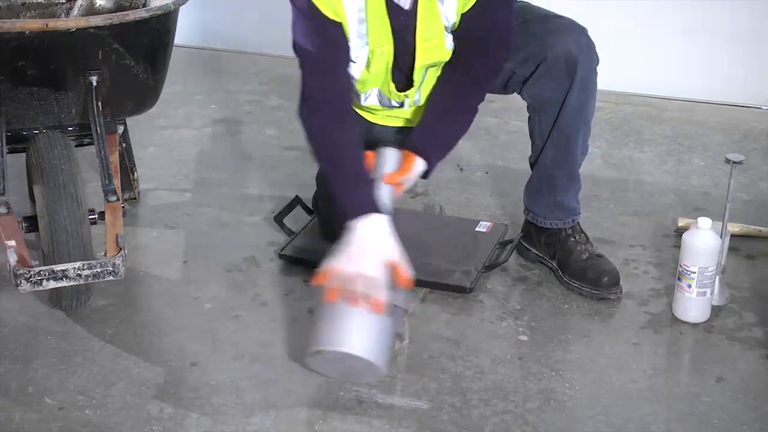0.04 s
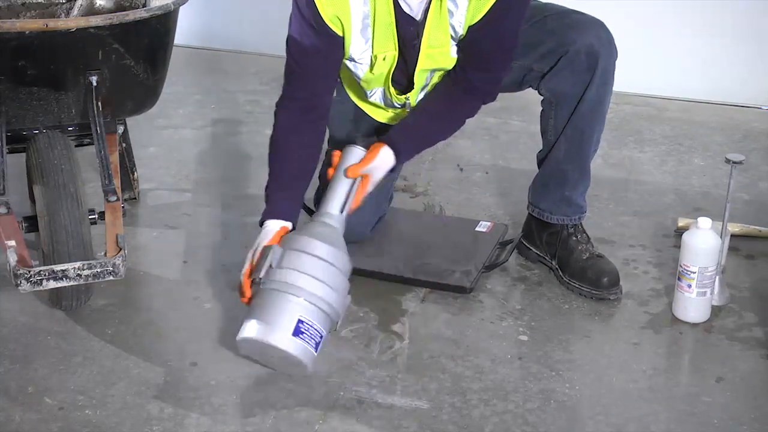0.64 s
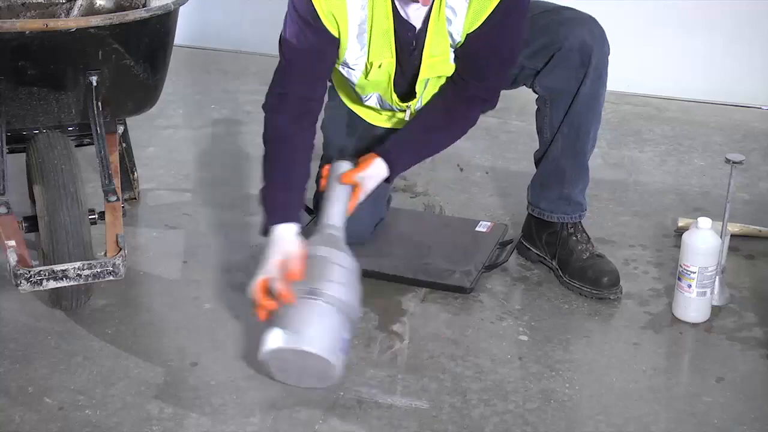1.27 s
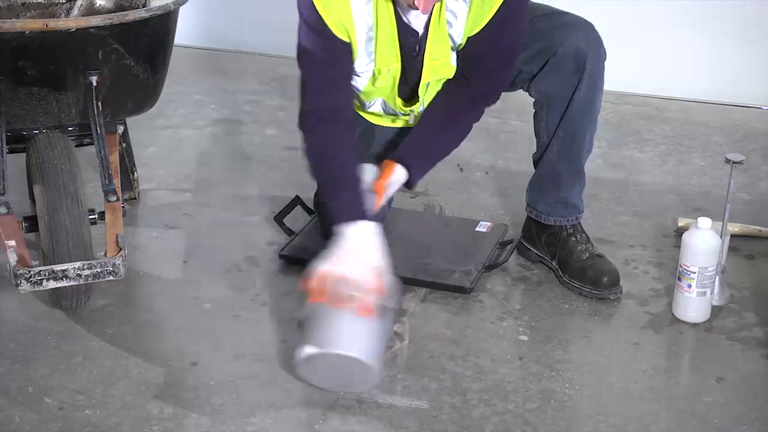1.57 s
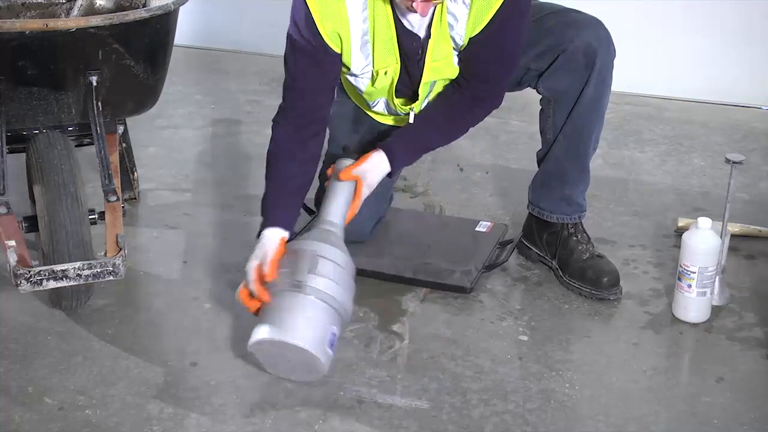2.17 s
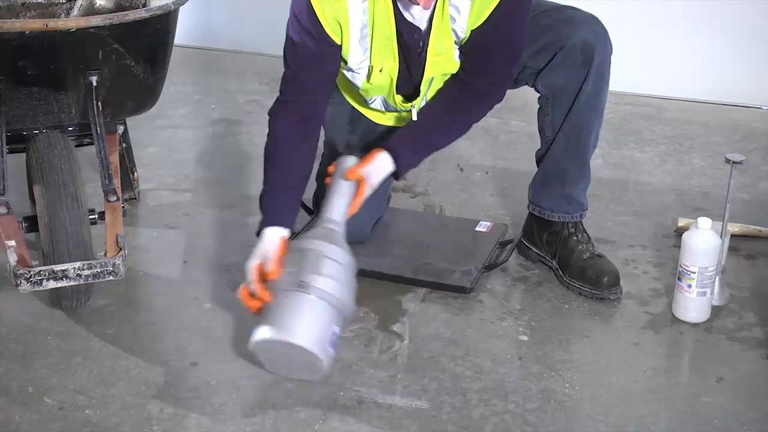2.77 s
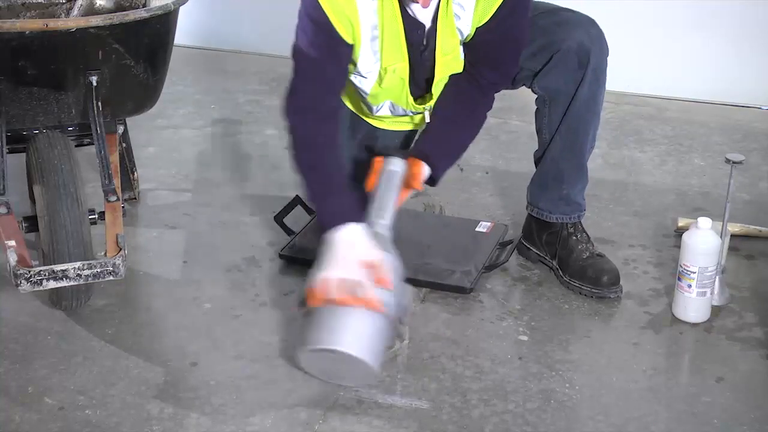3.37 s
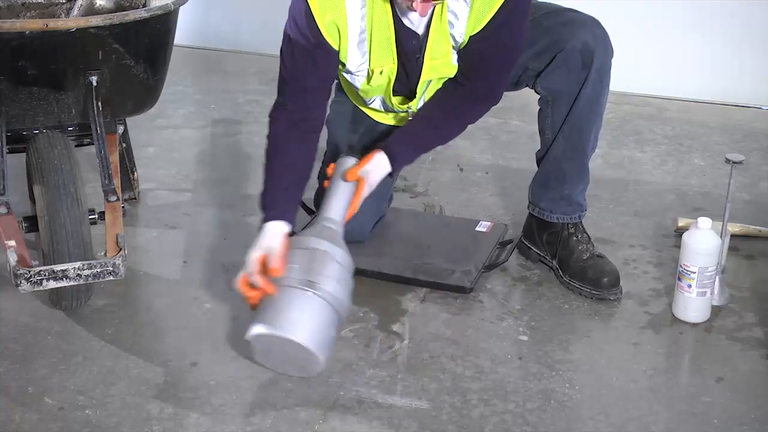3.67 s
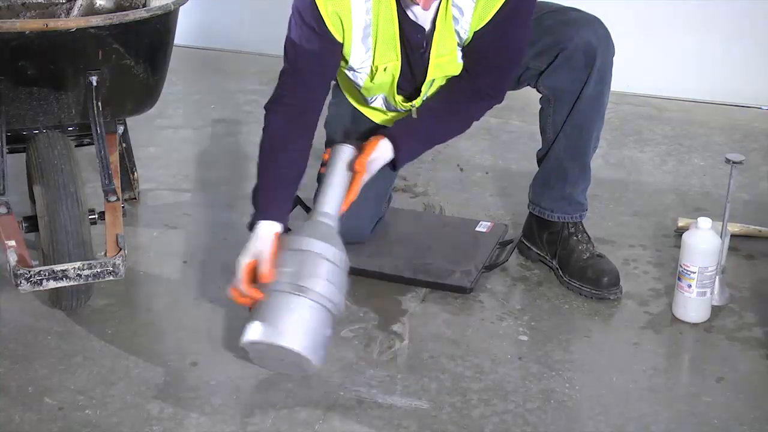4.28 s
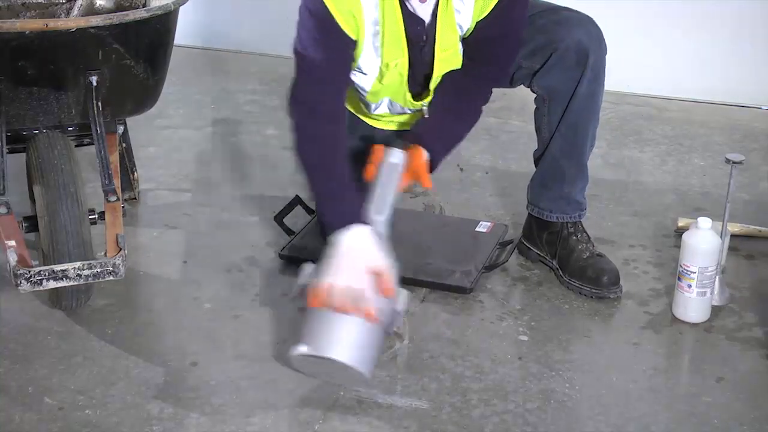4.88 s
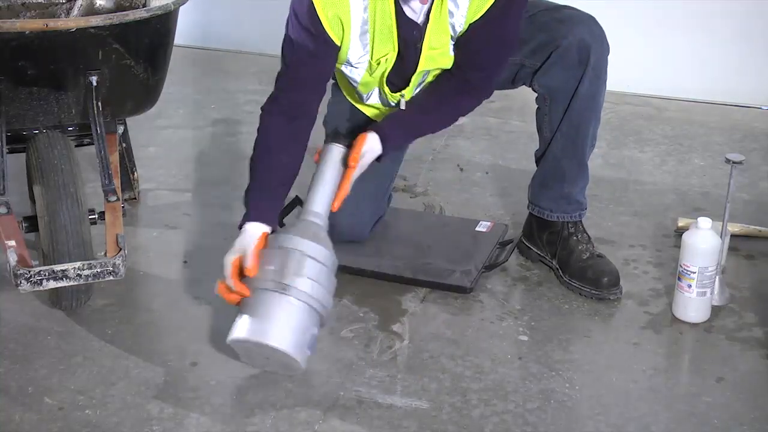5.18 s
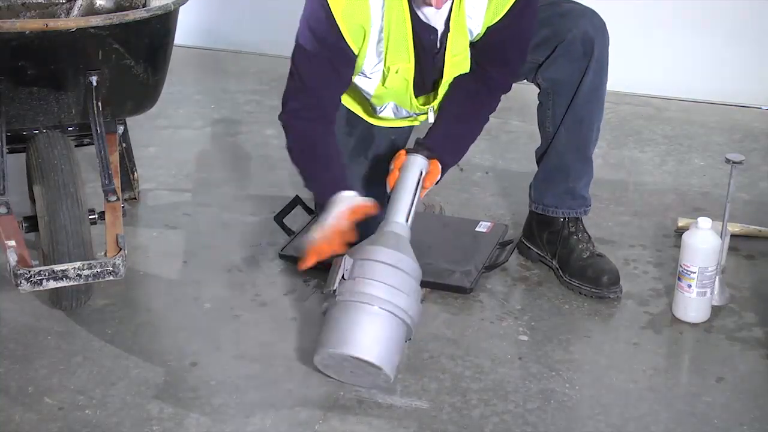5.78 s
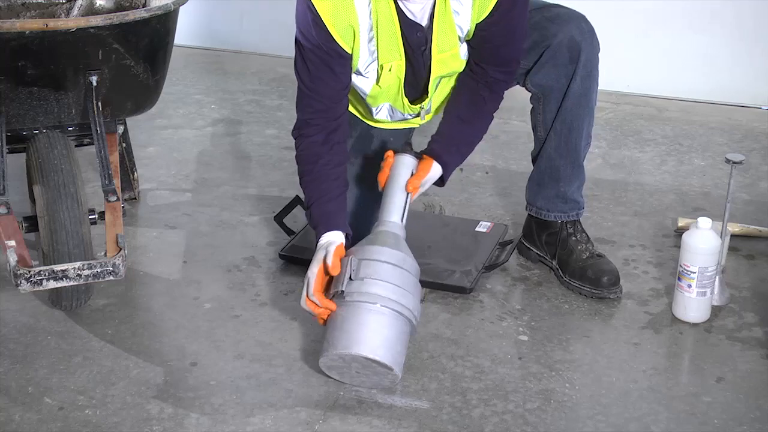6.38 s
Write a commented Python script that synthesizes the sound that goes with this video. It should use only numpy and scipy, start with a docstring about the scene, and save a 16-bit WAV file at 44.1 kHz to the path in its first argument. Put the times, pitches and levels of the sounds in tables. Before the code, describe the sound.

From the start, wet concrete sloshes inside a sealed metal container that is rolled quickly to and fro on its rim over a hard floor. The swings come steadily, about every 0.4 seconds, fifteen in all. Each gives a low, hollow surge with dull thuds, a gulp of trapped air and a few glugs. Stones knock and scrape along the wall, liquid patters faintly inside, and the bumping rim makes the shell ring briefly. The first swings are softer; the sound builds by about 2 seconds and is strongest around 3 to 4 seconds. Sleeves rustle and a stiff vest crackles lightly throughout. A steel clamp clinks quietly near 0.2, 4 and 5.4 seconds. The last swing comes at about 5.4 seconds and fades to a faint hush, with one tiny clink at 6.3 seconds. Everything sounds close, with a short workshop echo.

```python
"""Wet concrete sloshes in a sealed metal air meter, rolled to and fro on its rim, then held still.
On every swing the wet mix (the slurry) surges, thumps and glugs, and the trapped air gulps.
Stones tumble along the meter's wall, and the rim bumps over a workshop floor and rings the shell.
The lid's clamp clinks, sleeves rustle on a safety vest and liquid splashes inside.
The hard room adds a short echo."""
import sys
import numpy as np
from scipy import signal
from scipy.io import wavfile

SR = 44100
rng = np.random.default_rng(int(sys.argv[2]) if len(sys.argv) > 2 else 0)


def master_out(mix):
    """Clip the mix to full scale and print it as 16-bit PCM to the path in sys.argv[1]."""
    frames = np.transpose(np.atleast_2d(mix))
    ceiling = np.clip(frames, -1, 1)
    pcm = np.round(ceiling * 32767).astype(np.int16)
    wavfile.write(sys.argv[1], SR, pcm)


N = 283911

# Levels in all tables are relative: each sound gets its final loudness when it is mixed.
# The swings of the meter. Each row: middle in seconds, hold in seconds, levels in dB of slurry,
# stones, rim and splash, delay of the splash in seconds, level of the gulp in dB.
SWINGS = [(0.136, 0.1, -37.5, -39, -47.5, -59.5, 0.11, -41),
          (0.565, 0.13, -35, -36, -45.5, -63, 0.062, -41),
          (0.931, 0.099, -35, -35.5, -46, -60, 0.0088, -41),
          (1.337, 0.084, -33.0, -34, -46.5, -56.5, 0.085, -40.5),
          (1.692, 0.066, -31, -34, -42, -64, 0, -38), (2.092, 0.051, -31.5, -30.5, -40.0, -61, 0.028, -50),
          (2.402, 0.091, -30, -31.5, -45.5, -73, 0.072, -38),
          (2.822, 0.067, -30, -32, -41.0, -58, 0.0053, -36.5),
          (3.148, 0.078, -30.5, -29.5, -42.5, -70, 0.04, -35.5),
          (3.543, 0.025, -26.5, -27.5, -46, -60, 0.05, -49),
          (3.889, 0.12, -31.5, -32.5, -40.5, -63, 0.002, -32),
          (4.303, 0.057, -31.5, -33, -48.5, -77, 0.077, -42.5),
          (4.655, 0.1, -35, -38, -64, -69, 0.036, -36.5), (5.063, 0.071, -31, -35.5, -47, -87, 0.0076, -39),
          (5.421, 0.071, -30.5, -30.5, -46, -63, 0.029, -32)]
SLURRY, STONES, RIM, GULP = 2, 3, 4, 7  # column numbers
# Lumps landing on the wall. Each row: time in seconds, levels in dB of thud, slurry boom and shell ring.
THUMPS = [(0.06, -35, -46, -45), (0.517, -28.5, -28.5, -53.0), (0.552, -30, -49, -42.0),
          (0.602, -21.5, -40, -36), (0.834, -25, -33, -55), (0.895, -27, -43, -35.5),
          (0.925, -43, -28, -55), (1.275, -22.5, -48, -34.5), (1.338, -20.5, -29, -42),
          (1.62, -24.5, -23, -61), (1.684, -23, -20.5, -62), (1.785, -32.0, -32, -55.0),
          (2.054, -32, -25, -49), (2.081, -15, -26.5, -54), (2.344, -22, -32, -30),
          (2.425, -47, -44, -38.5), (2.782, -17.5, -30, -36.5), (2.814, -15.5, -34, -37.5),
          (3.073, -20.5, -26, -29), (3.115, -27, -19.5, -42), (3.198, -19.5, -43, -50.0),
          (3.229, -22, -41, -55), (3.513, -33, -29, -26.5), (3.534, -23.5, -36, -49),
          (3.591, -24.5, -33, -43), (3.801, -22.0, -22, -33), (3.935, -24.5, -27, -54),
          (4.273, -24, -31, -39), (4.31, -22, -41, -40), (4.603, -21.0, -24, -39.0),
          (4.619, -19.5, -28, -42.5), (4.663, -23.5, -35, -37), (5.022, -24, -31, -43),
          (5.063, -26.5, -36, -42), (5.36, -20.5, -37, -39.5), (5.448, -19.5, -33, -35.5)]
THUD, BOOM, RING = 1, 2, 3  # column numbers


def gain_of(db):
    """Turns decibels into a number to multiply a sound by."""
    return 10 ** (np.asarray(db) / 20)


def evened(x):
    """Scales x so that its average level (rms) is one."""
    return x / np.sqrt(np.mean(x ** 2) + 1e-20)


def steadied(x, seconds):
    """Keeps the fine grain of x but holds its slower level at one."""
    window = np.hanning(max(int(seconds * SR), 64))
    power = abs(signal.fftconvolve(x ** 2, window / window.sum(), "same"))
    return x / np.sqrt(power + 1e-20)


def read(points, hz):
    """Looks up a value between the rows of a table, on a logarithmic frequency scale."""
    f, value = np.transpose(points)
    return np.interp(np.log(hz + 1), np.log(f + 1), value)


def colour(x, spectrum, size=8192):
    """Gives x the tone colour in a table, with a filter that never sounds ahead of a hit."""
    log_gain = np.log(gain_of(read(spectrum, abs(np.fft.fftfreq(size, 1 / SR)))))
    taps = np.fft.ifft(np.exp(np.conj(signal.hilbert(log_gain)))).real[:size // 2]
    return signal.oaconvolve(x, taps)[:len(x)]


def grains(per_s, spread_db):
    """Tiny hits at random moments, a few much larger than the rest."""
    size = gain_of(spread_db * np.minimum(rng.exponential(1, N), 4))
    return size * rng.choice([-1, 1], N) * (rng.random(N) < per_s / SR)


def waver(hz, size):
    """A smooth random wobble with an average level (rms) of one."""
    noise = rng.standard_normal(size + SR // 4)
    return evened(signal.lfilter(*signal.butter(2, hz, fs=SR), noise)[-size:])


def add(mix, s, sound):
    """Mixes a sound in, starting at s seconds."""
    part = mix[max(round(s * SR), 0):][:len(sound)]
    part += sound[:len(part)]


def over_time(rule):
    """Works out a slow curve about once a millisecond and joins the points."""
    at = np.linspace(0, N, N // 44)
    return np.interp(np.arange(N), at, rule(at / SR))


def ring(x, modes):
    """Every hit in x rings an object's own tones (modes); each fades by 60 dB in its ring time."""
    t = np.arange(SR // 2) / SR
    tones = [gain_of(db - 60 * t / ring_s) * np.sin(2 * np.pi * hz * t) for hz, db, ring_s in modes]
    # neighbouring tones swing in opposite directions
    return signal.oaconvolve(x, sum(tones[::2]) - sum(tones[1::2]))[:N]


def driven(hits, modes, db, seconds):
    """Hits ring tones that hang on between swings; the loudness follows the curve db."""
    tone = ring(hits * gain_of(np.roll(db, -SR // 100)), modes)  # the push leads the sound by 10 ms
    return gain_of(db) * steadied(tone / gain_of(db), seconds)


def swaying(column, lag_s, rise_db_per_s, fall_db_per_s):
    """Power of one part of the sound: on every swing it rises, holds and falls away."""
    swings = np.transpose(SWINGS)[:, :, None]
    middle, hold = swings[0] + lag_s, swings[1]
    start, end = middle - hold / 2, middle + hold / 2

    def power(t):
        before_db = rise_db_per_s * np.maximum(start - t, 0)
        after_db = fall_db_per_s * np.maximum(t - end, 0)
        return sum(gain_of(swings[column] - before_db - after_db) ** 2)
    return over_time(power) + 1e-10


def jolted(rows, column, settle_db_per_s, rise_db_per_s=1760, lag_s=0.0027):
    """Power that leaps to a peak just after each listed moment, then settles."""
    power, t = np.zeros(N), np.arange(-SR // 40, SR // 2) / SR
    shape_db = np.minimum(rise_db_per_s * t, -settle_db_per_s * t)
    for row in rows:
        add(power, row[0] + lag_s + t[0], gain_of(row[column] + shape_db) ** 2)
    return power


def stirred(swing, lumps, turn_db):
    """Level in dB of a part stirred by the swings, the landing lumps and the changes of direction."""
    # The load shifts as the meter turns back. Each row: time in seconds, level in dB.
    turns = [(0.41, -50.5), (1.544, -38.5), (1.935, -49.0), (2.265, -55), (2.645, -44.5), (2.95, -51),
             (3.395, -40.5), (4.134, -41), (4.51, -51.5), (4.885, -46), (5.275, -63)]
    shifts = gain_of(turn_db) ** 2 * jolted(turns, 1, settle_db_per_s=160)
    return 10 * np.log10(swing + lumps + shifts)


def blows(rows, spectrum, seconds, scatter_db):
    """Each blow is one push and a quickly dying scatter of smaller ones."""
    out, t = np.zeros(N), np.arange(SR // 6) / SR
    for s, db, *_ in rows:
        push = gain_of(scatter_db - 60 * t / seconds) * rng.standard_normal(len(t))
        push[0] += 1
        blow = colour(push, spectrum)
        add(out, s, gain_of(db) * blow / abs(blow).max())
    return out


def swells(times, widths, dbs):
    """A level that rises and falls smoothly around each listed moment."""
    def level(t):
        powers = (gain_of(db) ** 2 / np.cosh(np.minimum(abs((t - s) / width), 20))
                  for s, width, db in np.broadcast(times, widths, dbs))
        return np.sqrt(sum(powers))
    return over_time(level)


def slurry():
    """Soft folds of wet concrete boom inside the meter; the shifting weight rumbles in the floor."""
    # Tone colours of the folds and of the rumble. Each row: frequency in Hz, level in dB.
    fold_colour = [(60, -48.5), (112, -17), (152, -6.5), (240, -1.5), (300, -1.5), (600, -31.5),
                   (2000, -67)]
    rumble_colour = [(10, -33), (25, -8), (45, -1.5), (65, -17), (85, -10), (105, -24), (130, -6.5),
                     (200, -5.5), (800, -92)]
    # Tones of the slurry with the air above it, and of the weight on the floor.
    # Each row: pitch in Hz, level in dB, ring time in seconds.
    hollow_tones = [(142, -18, .2), (160, -2, .22), (178, -10, .3), (200, 0, .33), (216, -2, .3),
                    (230, -8, .3), (255, -11, .2)]
    floor_tones = [(85, 0, .45)]
    swing = swaying(SLURRY, lag_s=0.0068, rise_db_per_s=142, fall_db_per_s=184)
    surge_db = stirred(swing, jolted(THUMPS, BOOM, settle_db_per_s=410), turn_db=6)
    folds = colour(grains(per_s=300, spread_db=6.0), fold_colour)
    boom = driven(folds, hollow_tones, surge_db, seconds=0.074)
    rumble = evened(colour(rng.standard_normal(N), rumble_colour))
    drone = steadied(ring(rng.standard_normal(N), floor_tones), seconds=0.93)
    return (gain_of(-1.43) * boom + gain_of(0.49 * surge_db - 36.5) * rumble
            + gain_of(0.32 * surge_db - 57) * drone)


def stones():
    """Big stones knock on the wall; sand and gravel scrape it and stir the shell's upper tones."""
    # Tone colours of the stones and of the sand. Each row: frequency in Hz, level in dB.
    stone_colour = [(120, -31), (240, -7), (300, 4), (560, 1), (700, 11), (1200, -27.5), (2500, -70)]
    sand_colour = [(300, -1), (590, -5.5), (740, 1), (870, -4.5), (1150, -8), (1320, -17.5), (1600, -18),
                   (2000, -22.5), (3500, -45), (9000, -60)]
    # Tones of the wall, muffled by its load, and the shell's faint upper tones.
    # Each row: pitch in Hz, level in dB, ring time in seconds.
    wall_tones = [(298, -3, .13), (312, -4, .15), (334, -2, .17), (353, -3, .16), (370, 0, .11),
                  (391, -1, .12), (424, -7, .2), (465, -9, .15), (490, -12, .13), (520, -10, .21),
                  (565, -16, .18)]
    upper_tones = [(738, 0, .18), (762, -3, .3), (797, -2, .15), (823, -3, .14), (885, -8, .22),
                   (931, -5, .3), (962, -11, .3), (987, -9, .26), (1099, -7, .2), (1150, -6, .1),
                   (1244, -14, .2), (1469, -16, .22), (1580, -13, .12)]
    swing = swaying(STONES, lag_s=0, rise_db_per_s=223, fall_db_per_s=150)
    lumps = gain_of(-13.5) ** 2 * jolted(THUMPS, THUD, settle_db_per_s=410)
    tumble_db = stirred(swing, lumps, turn_db=0.5)
    hits = colour(grains(per_s=250, spread_db=6.0), stone_colour)
    knocks = driven(hits, wall_tones, tumble_db, seconds=0.032)
    sand = steadied(colour(grains(per_s=800, spread_db=3.5), sand_colour), seconds=0.15)
    gravel = driven(grains(per_s=700, spread_db=3.5), upper_tones, 0.77 * tumble_db, seconds=0.48)
    return gain_of(-1) * knocks + gain_of(0.75 * tumble_db - 24.5) * sand + gain_of(-27) * gravel


def rim(bend_share=0.01, wobble_hz=8.2):
    """The rim bumps over the rough floor and keeps the shell ringing; the moving load bends its pitch."""
    # Tone colour of the bumps. Each row: frequency in Hz, level in dB.
    bump_colour = [(300, -65), (585, -18.5), (625, -11), (670, -5), (720, -28.5), (1400, -52),
                   (3000, -79.5)]
    # The shell's closely spaced tones. Each row: pitch in Hz, level in dB, ring time in seconds.
    shell_tones = [(634, 0, .38), (650, -2, .28), (664, -4, .36)]
    swing = swaying(RIM, lag_s=-0.015, rise_db_per_s=150, fall_db_per_s=206)
    roll_db = stirred(swing, jolted(THUMPS, RING, settle_db_per_s=234), turn_db=-5)
    bumps = colour(grains(per_s=280, spread_db=8.5), bump_colour)
    tone = driven(bumps, shell_tones, roll_db, seconds=0.089)
    # running through the tone a little faster or slower bends its pitch
    drift = bend_share / (2 * np.pi * wobble_hz) * SR * waver(hz=wobble_hz, size=N)
    return gain_of(1) * np.interp(np.arange(N) + drift, np.arange(N), tone)


def thumps():
    """Lumps of concrete land against the wall with a dull thud."""
    # Tone colour of a thud. Each row: frequency in Hz, level in dB.
    thud_colour = [(60, -49), (115, -35.5), (200, -3.5), (360, 10.5), (540, -5.5), (650, -2), (780, -17),
                   (1200, -23.5), (2000, -52), (6000, -94)]
    return gain_of(-3.5) * blows(THUMPS, thud_colour, seconds=0.048, scatter_db=-23.5)


def gulps():
    """Trapped air gulps once a swing: a fuzzy, hollow note that climbs as the wave squeezes it."""
    mid_swing_hz, rise_hz_per_s, wobble_width_hz = 208.4, 167.6, 14.8
    lag_s, spread_s, flutter_db = 0.071, 0.076, 3.5
    out, t = np.zeros(N), np.arange(-SR // 8, SR // 2) / SR
    swell = np.exp(-((t - lag_s) / spread_s) ** 2 / 2) * signal.windows.tukey(len(t), .2)
    for row in SWINGS:
        hz = mid_swing_hz + rise_hz_per_s * t + wobble_width_hz / 2 * waver(hz=15.1, size=len(t))
        db = row[GULP] - 2 + flutter_db * waver(hz=12.5, size=len(t))
        add(out, row[0] + t[0], gain_of(db) * swell * np.sin(2 * np.pi * np.cumsum(hz) / SR))
    return out


def glugs(per_swing=3):
    """Big bubbles burst near mid-swing, each a short note that bends upward; bigger ones are lower."""
    low_hz, high_hz, rise_per_s = 275.8, 478, 1.02
    ring_s, scatter_s = 0.14, 0.05
    out, t = np.zeros(N), np.arange(SR // 6) / SR
    for row in SWINGS:
        fade = gain_of(row[STONES] - 2.5 - 60 * t / ring_s)  # louder when the stones are louder
        for when, size in rng.random((per_swing, 2)):
            hz = high_hz * (low_hz / high_hz) ** size * (1 + rise_per_s * t)
            note = np.sin(2 * np.pi * np.cumsum(hz) / SR) * np.minimum(t * hz, 1)
            add(out, row[0] + scatter_s * (2 * when - 1), fade * note)
    return out


def clamp(fall_db_per_octave=39):
    """The lid's steel clamp clinks under the hand; each touch favours the tones near one pitch."""
    # The clamp's tones. Each row: pitch in Hz, level in dB, ring time in seconds.
    clamp_tones = [(1620, 19, 0.17), (1920, 7, 0.23), (2780, 12, 0.021), (2920, 4.5, 0.078),
                   (3560, -4.5, 0.26), (3750, -33, .15)]
    # The touches. Each row: start in seconds, level in dB, favoured pitch in Hz.
    touches = [(0.154, -49, 2460), (3.996, -54, 3450), (5.03, -66, 3400), (5.38, -58, 3020),
               (6.306, -61.5, 3530)]
    out, t = np.zeros(N), np.arange(SR // 3) / SR
    for s, db, touch_hz in touches:
        for hz, tone_db, ring_s in clamp_tones:
            start_db = db + tone_db - fall_db_per_octave * abs(np.log2(hz / touch_hz))
            add(out, s, gain_of(start_db - 60 * t / ring_s) * np.sin(2 * np.pi * hz * t))
    return gain_of(1) * out


def clothes():
    """Stiff cloth crackles and snaps as it folds, and hisses as it slides."""
    # A sleeve rubs over the vest.
    # Each row: loudest moment in seconds, width in seconds, crackle level in dB, hiss level in dB.
    rubs = [(.18, 0.0084, -52.5, -70), (.265, 0.014, -60, -74), (.6, .06, -67.5, -77),
            (1.01, 0.033, -64, -72.5), (1.43, 0.051, -64.5, -74), (1.6, 0.0087, -64, -82),
            (1.725, 0.018, -54.5, -64), (1.775, .02, -56.5, -60), (2.12, .03, -62.5, -69),
            (2.48, 0.027, -75, -71), (2.54, 0.035, -55, -83), (2.75, 0.018, -59.5, -86),
            (2.825, 0.02, -61, -70), (3.22, 0.031, -57.5, -66), (3.47, 0.011, -61, -85),
            (3.57, 0.036, -61.5, -68.5), (3.92, 0.052, -62, -67.5), (4.018, 0.016, -56.5, -69),
            (4.361, 0.029, -62, -63), (4.58, .03, -66, -69), (4.74, .04, -60, -63), (5.08, 0.028, -65, -71),
            (5.395, 0.0054, -57, -79), (5.46, 0.017, -60, -70), (5.7, 0.013, -71, -92)]
    # Creases of the vest that snap. Each row: start in seconds, level in dB.
    creases = [(0.154, -33.5), (0.1814, -47), (0.2473, -37.5), (0.9896, -43), (1.718, -42), (2.5112, -51),
               (2.5217, -32.5), (2.5444, -36.5), (2.6219, -40.5), (2.651, -44), (2.6888, -46),
               (2.7086, -43), (2.7313, -39.5), (2.7505, -43), (3.263, -38), (3.4466, -50), (3.459, -44),
               (3.9971, -30.5), (4.765, -40), (5.381, -44)]
    # Tone colours of the crackle, the hiss and a snap. Each row: frequency in Hz, level in dB.
    crackle_colour = [(500, 9.5), (1500, 1), (2200, 1.5), (3000, 2.5), (4500, -5), (7000, -6.5),
                      (10000, -10), (15500, -32)]
    hiss_colour = [(2000, -42), (5000, -7), (7500, -2.5), (10500, -4), (12500, -9), (15500, -24)]
    snap_colour = [(400, 17), (1500, -30), (3100, 1), (5000, -7.5), (8000, -20), (12000, -13), (15500, -34)]
    s, width, crackle_db, hiss_db = np.transpose(rubs)
    folding = evened(colour(grains(per_s=3500, spread_db=3.0), crackle_colour))
    sliding = evened(colour(grains(per_s=9000, spread_db=3.0), hiss_colour))
    crackle = swells(s, width, crackle_db) * folding
    hiss = swells(s, 1.2 * width, hiss_db) * sliding
    snaps = blows(creases, snap_colour, seconds=0.11, scatter_db=-27.5)
    return gain_of(2.14) * crackle + hiss + gain_of(2) * snaps


def splashes():
    """Fine drops patter on the inside of the wall as the liquid breaks, once a swing."""
    # Tone colour of the drops. Each row: frequency in Hz, level in dB.
    drop_colour = [(700, -23), (1200, 6), (1600, 4.5), (2200, -3), (3000, -6.5), (5000, -21), (10000, -40)]
    middle, *_, splash_db, lag, _ = np.transpose(SWINGS)
    drops = evened(colour(grains(per_s=1800, spread_db=3.5), drop_colour))
    return gain_of(-1) * swells(middle + lag, widths=0.025, dbs=splash_db) * drops


def room(x):
    """Scattered echoes come off the floor and walls, each frequency dying at its own speed."""
    # How long the room rings. Each row: frequency in Hz, seconds to fade by 60 dB.
    ring_times = [(120, 0.6), (320, 0.83), (840, 0.57), (2200, 0.78), (10000, 0.32)]
    echoes = rng.choice([-1., 1.], SR) * (rng.random(SR) < 2500 / SR)
    echoes[:SR // 150] = 0  # the gap before the first echo
    hz, t, bands = signal.stft(echoes, SR, nperseg=256)
    fade = gain_of(-60 * t / read(ring_times, hz)[:, None])
    tail = signal.istft(bands * fade, SR, nperseg=256)[1]
    return signal.fftconvolve(x, tail / np.linalg.norm(tail))[:N]


def scene():
    """The meter and the clothes in the room, over the faint hush of still air."""
    # Tone colour of the hush. Each row: frequency in Hz, level in dB.
    air_colour = [(12, -8), (25, -6), (48, -4), (70, -9), (120, -15), (250, -21), (335, -14), (520, -22),
                  (800, -19), (1300, -27.5), (3000, -32.5), (5000, -37), (10000, -38), (15500, -48)]
    near = thumps() + slurry() + gulps() + glugs() + stones() + rim() + splashes() + clamp() + clothes()
    air = gain_of(-59) * evened(colour(rng.standard_normal(N), air_colour))
    return (near + gain_of(-13) * room(near) + air)[None]


def record(dry):
    """Cuts away the very highest treble."""
    cutoff_hz = 15720
    low_pass = signal.firwin(511, cutoff_hz, window=("kaiser", 9), fs=SR)
    return signal.oaconvolve(dry, low_pass[None], "same")


dry = scene()
out = record(dry)
master_out(out)
```